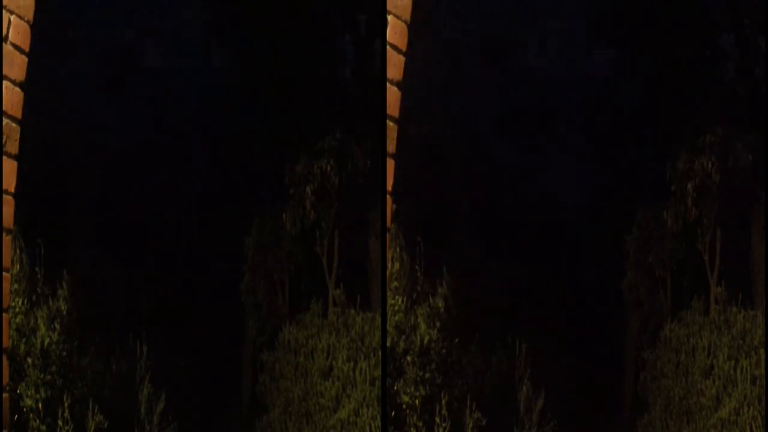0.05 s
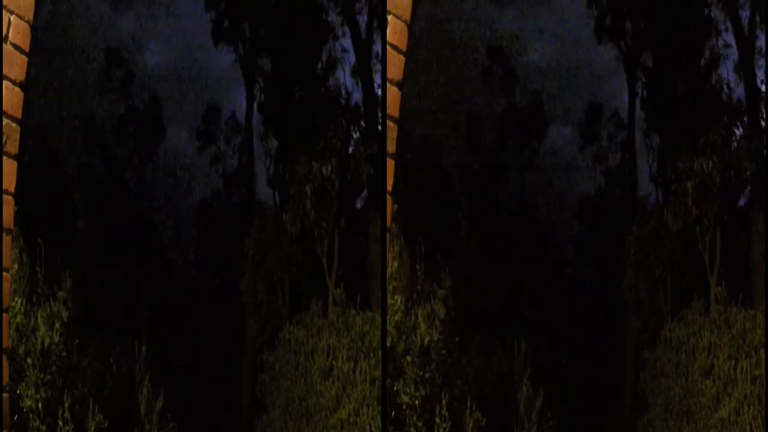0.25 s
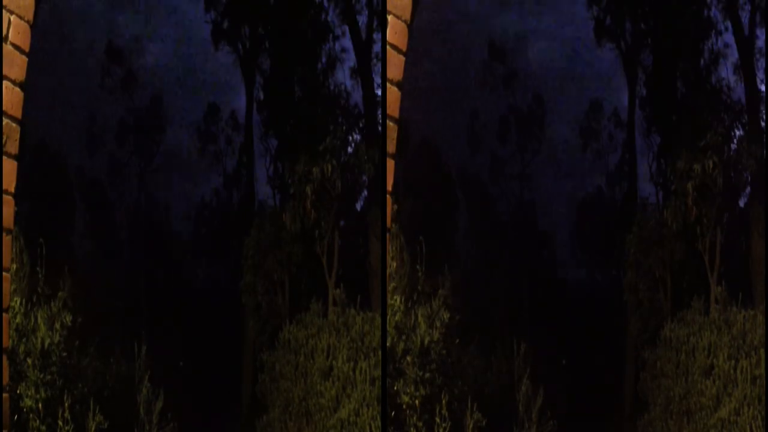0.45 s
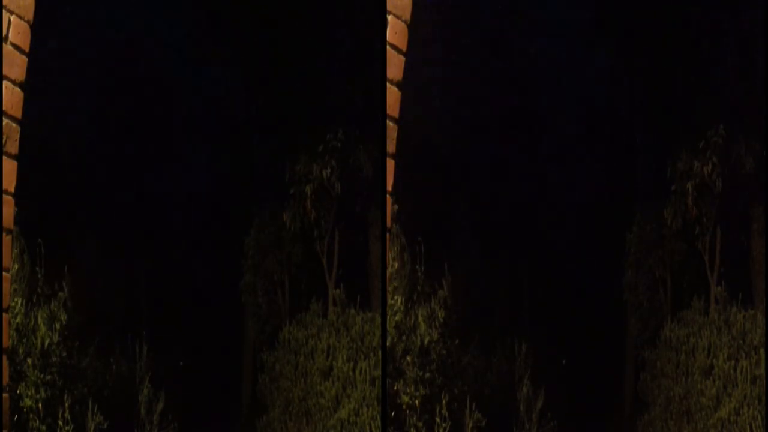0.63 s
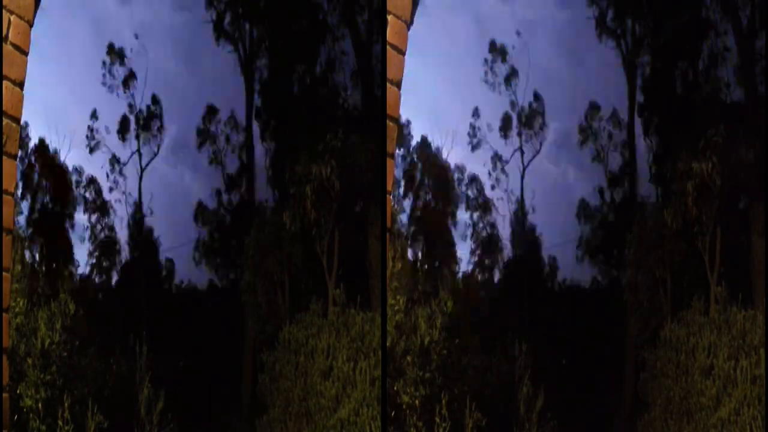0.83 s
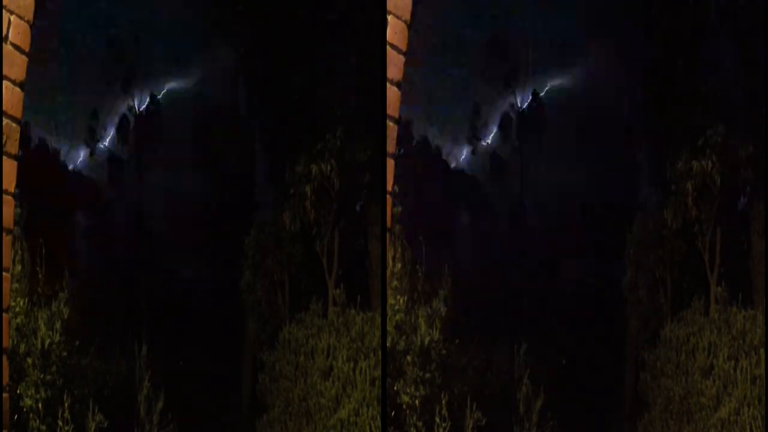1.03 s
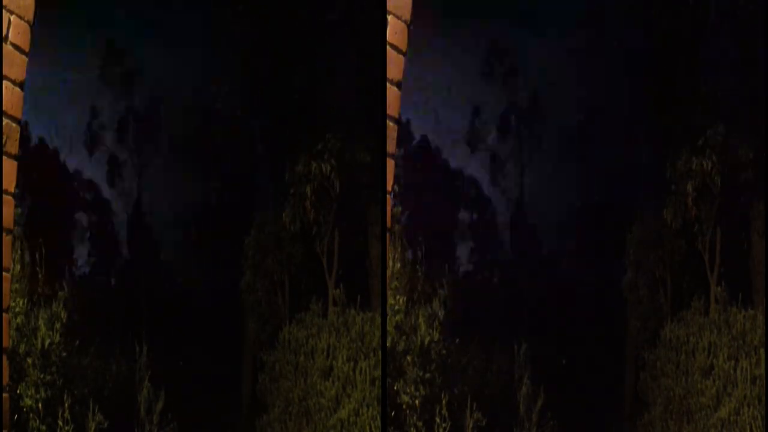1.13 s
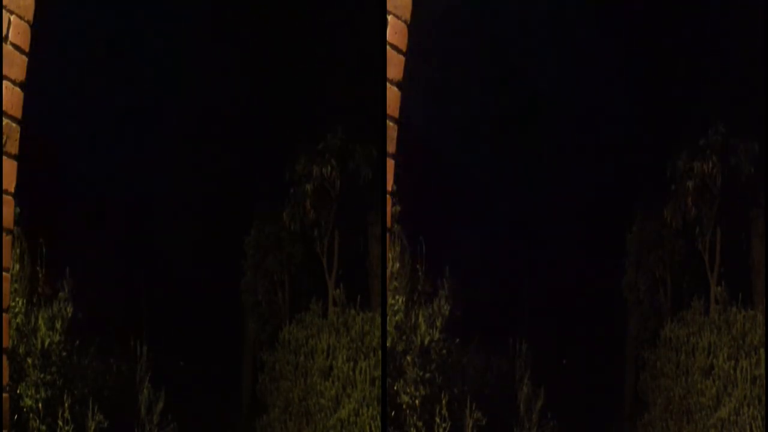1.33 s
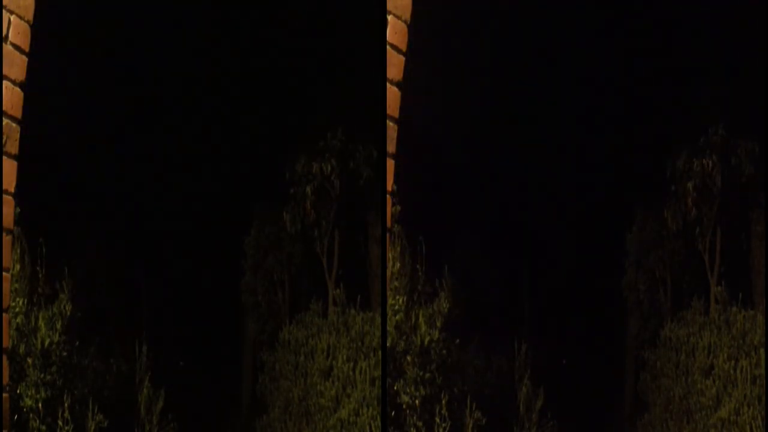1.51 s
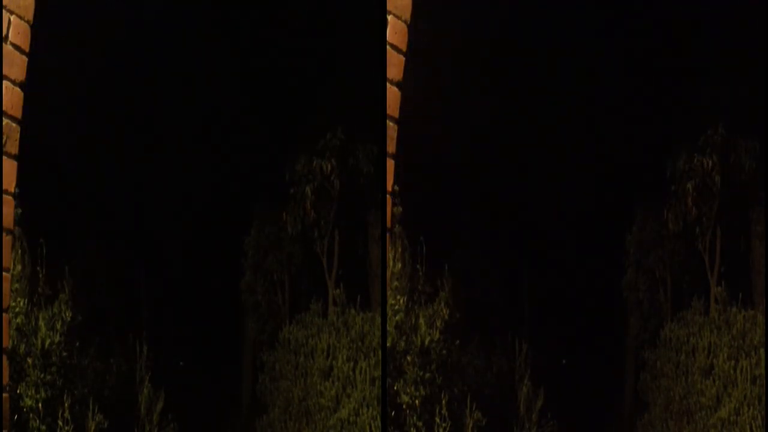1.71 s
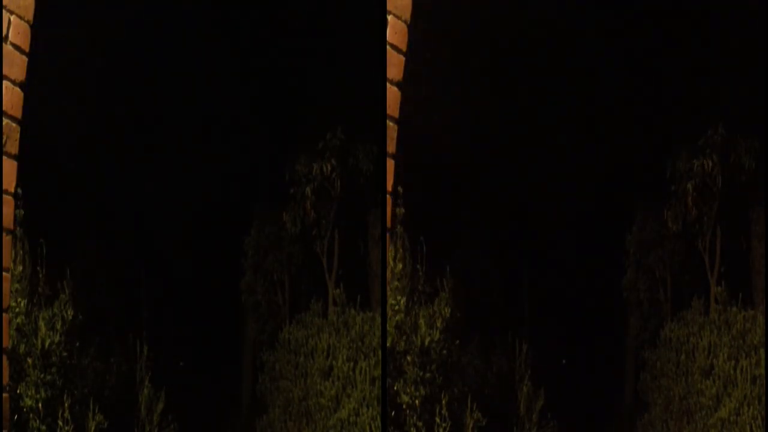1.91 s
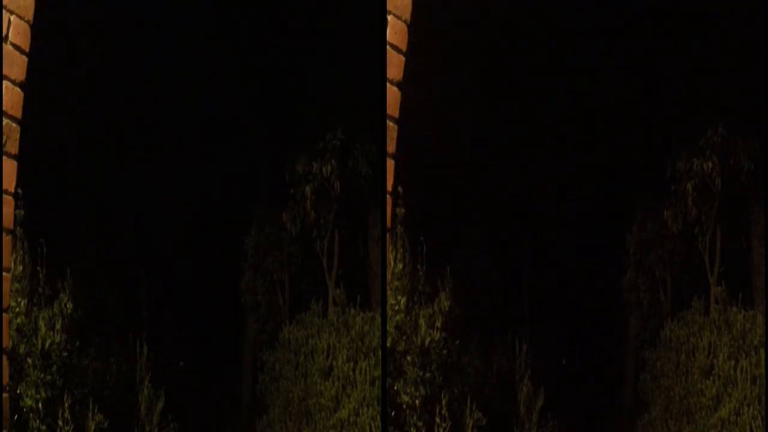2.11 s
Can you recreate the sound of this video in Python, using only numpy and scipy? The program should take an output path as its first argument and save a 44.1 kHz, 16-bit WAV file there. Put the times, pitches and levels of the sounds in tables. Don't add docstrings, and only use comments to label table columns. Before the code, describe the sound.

A loud thunder clap cracks, then rolls away in low rumbles over steady hissing rain

```python
import sys
import numpy as np
from scipy import signal
from scipy.fft import rfft, irfft
from scipy.io import wavfile
from scipy.ndimage import uniform_filter1d, minimum_filter1d

SR = 44100
rng = np.random.default_rng(int(sys.argv[2]) if len(sys.argv) > 2 else 0)


def wav_record(signal):
    frames = np.transpose(np.atleast_2d(signal))
    bounded = np.clip(frames, -1, 1)
    quanta = np.round(bounded * 32767).astype(np.int16)
    wavfile.write(sys.argv[1], SR, quanta)


def gain_from_db(level_db):
    decades = np.asarray(level_db, float) / 20
    return 10 ** decades


N = 94815


def rms_one(x):
    return x / np.sqrt(np.mean(x ** 2) + 1e-20)


def colour(x, spectrum):
    size = 2 ** 17
    hz, db = np.transpose(spectrum)
    f = np.arange(size // 2 + 1) * SR / size + 1
    log_gain = np.interp(np.log(f), np.log(hz), db) * np.log(10) / 20
    cepstrum = irfft(log_gain)
    cepstrum[1:size // 2] *= 2
    cepstrum[size // 2 + 1:] = 0
    response = np.exp(rfft(cepstrum))
    filtered = irfft(rfft(x, size) * response)[:N]
    return filtered / np.sqrt(np.mean(np.abs(response) ** 2))


def drift(rate_hz):
    r = np.exp(-2 * np.pi * rate_hz / SR)
    wander = signal.lfilter([1], [1, -2 * r, r * r], rng.standard_normal(N + SR))
    return rms_one(wander[SR:])


def clicks(per_s, spread_db):
    sizes = gain_from_db(spread_db * np.minimum(rng.exponential(1, N), 4))
    signs = rng.choice([-1, 1], N)
    arrives = rng.random(N) < per_s / SR
    return rms_one(sizes * signs * arrives)


def even(x):
    window, share = int(0.05 * SR), 0.78
    power = uniform_filter1d(uniform_filter1d(x ** 2, window), window)
    level = np.sqrt(power + 1e-9)
    return rms_one(x / level ** share)


def swell(at, rise_s, hz):
    t = np.maximum(np.arange(N) / SR - at, 0)
    envelope = (t / rise_s * np.exp(1 - t / rise_s)) ** 2
    return envelope * np.sin(2 * np.pi * hz * t)


# frequency in Hz, level in dB per Hz.
GROUND_RAIN = [(500, -33), (900, -0.5), (1100, -8), (1540, -9), (2050, -6), (2600, -21), (3300, -24.5),
               (4700, -33.5), (9000, -78.5)]
# frequency in Hz, level in dB per Hz.
LEAF_RAIN = [(3500, -27), (5000, -5), (5700, -7.5), (6150, 0.5), (7200, -10), (8100, -7), (11300, -22),
             (13200, -21), (15700, -43)]


def rain():
    drops_per_s = 12000
    ground = colour(rng.standard_normal(N) + 0.3 * clicks(drops_per_s, 7.5), GROUND_RAIN)
    leaves = colour(rng.standard_normal(N) + 0.3 * clicks(drops_per_s, 1.7), LEAF_RAIN)
    ground_gain = gain_from_db(-35 + 0.4 * drift(7.4))
    leaf_gain = gain_from_db(-54.5 + 0.6 * drift(8))
    return ground_gain * rms_one(ground) + leaf_gain * rms_one(leaves)


# frequency in Hz, bandwidth in Hz, level in dB.
CORNER_MODES = [(50, 7.8, -6), (98.5, 16, 3), (148, 21, -7), (180, 45, -6), (222.7, 31, -10)]


def corner(x):
    out = x.copy()
    for hz, width_hz, db in CORNER_MODES:
        r = np.exp(-np.pi * width_hz / SR)
        bandpass = [(1 - r * r) / 2, 0, (r * r - 1) / 2]
        poles = [1, -2 * r * np.cos(2 * np.pi * hz / SR), r * r]
        out += gain_from_db(db) * signal.lfilter(bandpass, poles, x)
    return out


# start in seconds, peak in dB, pitch in Hz, rise in ms.
CORNER_SWELLS = [(.317, -8.5, 180, 22), (.32, -19, 92.7, 22), (0.334, -13, 50, 19), (.37, -11, 186.5, 21.3),
                 (0.386, -19, 50, 18), (0.391, -18.5, 238, 12.5), (.475, -19.5, 235.4, 20),
                 (.49, -20.5, 54.5, 28), (0.499, -26, 140, 30), (0.561, -20.5, 262.7, 24),
                 (.63, -15.5, 94, 18), (.66, -14.5, 91.2, 31), (.66, -16.5, 186, 35),
                 (0.671, -15.5, 241.8, 34.5), (.68, -22, 45, 34), (.72, -18.5, 260, 19.4),
                 (0.749, -16.5, 148, 19), (.745, -18, 45.5, 18), (1.0, -27, 97, 38),
                 (1.021, -19.5, 188, 23.4), (1.076, -22, 74.5, 24), (1.6, -35, 30, 30)]


def thuds():
    return sum(gain_from_db(db) * swell(at, ms * 0.00095, hz) for at, db, hz, ms in CORNER_SWELLS)


# time in seconds, boom level in dB, ring relative to boom in dB.
ROLL_LEVELS = [(0.0, -31, -2), (0.3, -26, -5), (0.32, -9, -4.5), (0.36, -12.5, -2), (0.44, -20.5, -2),
               (0.51, -13.5, -4.5), (0.54, -21.5, 2.5), (0.66, -15, -8.5), (0.68, -11.5, -4),
               (0.89, -23.5, -2), (1.03, -18, -3), (1.11, -24, -1.5), (1.3, -21.5, -9.5), (1.33, -24, -2.5),
               (2.0, -28, -4.5), (2.04, -33, 5.5), (2.08, -27, -9.5), (2.15, -29, 3.5)]
# frequency in Hz, level in dB per Hz.
BOOM_COLOUR = [(15, -38.5), (25, -5.5), (40, -6), (65, -8.5), (120, -7), (260, -10), (343, -21.5),
               (450, -25.5), (700, -71.5), (3000, -120)]
# frequency in Hz, level in dB per Hz.
HOLLOW_COLOUR = [(210, -32.5), (350, -27.5), (433, -12.5), (489, -5), (636, 0.5), (772, 0), (950, -17.5),
                 (1430, -23), (1500, -25), (1950, -54), (3300, -120)]


def roll():
    shocks_per_s, spread_db = 3000, 0
    s, level_db, ring_db = np.transpose(ROLL_LEVELS)
    t = np.arange(N) / SR
    boom = even(corner(colour(clicks(shocks_per_s, spread_db), BOOM_COLOUR)))
    hollow = even(colour(clicks(shocks_per_s, spread_db), HOLLOW_COLOUR))
    boom_db = np.minimum(np.interp(t, s, level_db) - 1, -17)
    hollow_db = np.minimum(np.interp(t, s, level_db + ring_db) + 0.5, -18)
    far_air = signal.butter(4, 2500, fs=SR, output="sos")
    return signal.sosfilt(far_air, boom * gain_from_db(boom_db) + hollow * gain_from_db(hollow_db))


# start in seconds, peak in dB, pitch of the hollow in Hz.
KINK_RINGS = [(0.228, -14.5, 700), (0.298, -14, 622), (0.31, -1, 598), (0.324, -6, 615), (0.335, -0.5, 600),
              (0.364, -14, 713), (0.382, -9, 630), (0.421, -5, 687), (0.492, -5.5, 662), (0.529, -8, 570),
              (0.679, -3, 670), (0.691, -2, 614), (0.704, -0.5, 610), (0.712, 0, 693), (0.718, -5.5, 633),
              (0.756, -14.5, 620), (0.763, -31.5, 670), (0.798, -24, 750), (0.969, -9.5, 564),
              (0.994, -6, 544), (1.024, -12.5, 725), (1.209, -18.5, 550), (1.329, -34, 680),
              (1.487, -12.5, 704), (1.614, -14, 718), (1.678, -12, 754), (1.804, -12, 748),
              (1.845, -17, 794), (1.959, -16, 670), (2.12, -19, 640)]


def kinks():
    rise_s, gain_db = 0.0033, -4
    return sum(gain_from_db(db + gain_db) * swell(at, rise_s, hz) for at, db, hz in KINK_RINGS)


# start in seconds, peak in dB, length in ms.
BEND_SHOCKS = [(0.022, -26.5, 24.5), (0.201, -22, 28.5), (0.3136, -6.5, 7.7), (0.331, -6, 7.7),
               (0.35, -6.5, 8.5), (0.359, -6, 3.8), (0.384, -7, 2.3), (0.393, -12, 5.9), (0.48, -8.5, 6),
               (0.656, -15, 8), (.685, -9.5, 8.9), (0.696, -13, 5), (1.019, -12.5, 12), (1.855, -19.5, 9.2),
               (2.07, -35, 9)]


def shocks():
    t, out = np.arange(N) / SR, np.zeros(N)
    for at, db, ms in BEND_SHOCKS:
        u = (t - at) / (ms / 1000)
        out += gain_from_db(db + 3.5) * (1 - 2 * u) * (u >= 0) * (u <= 1)
    air = signal.butter(4, 277, fs=SR, output="sos")
    return signal.sosfilt(air, out + 1e-18)


def scene():
    return (rain() + thuds() + roll() + kinks() + shocks())[None]


def limiter(x):
    rail, hold = 0.99, 200
    gain = minimum_filter1d(np.minimum(1, rail / (np.abs(x) + 1e-9)), size=2 * hold)
    return x * uniform_filter1d(uniform_filter1d(gain, size=hold), size=hold)


# start in seconds, level in dB, dullness from 0 to 1.
INPUT_TICKS = [
    (.0086, -31, .3),
    (.0286, -26.5, .3),
    (.0486, -26, .3),
    (.0686, -25.5, .3),
    (.3322, -29, .75),
    (.3327, -31, .75),
    (.357, -33, .75),
    (.3576, -34, .75),
]


def ticks():
    out = np.zeros(N)
    for at, db, dull in INPUT_TICKS:
        impulse = np.arange(N) == int(at * SR)
        out += gain_from_db(db) * signal.lfilter([1, -1], np.poly([0.85, dull, dull]), impulse)
    return out


def top_cut(x):
    return signal.sosfilt(signal.butter(12, 15500, fs=SR, output="sos"), x)


def record(dry):
    mix = limiter(dry) + ticks()
    return top_cut(mix)


dry = scene()
out = record(dry)
wav_record(out)
```